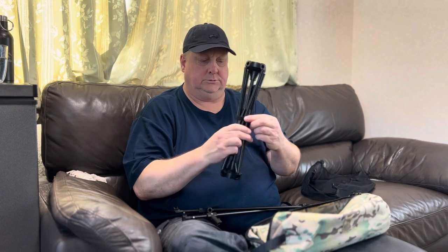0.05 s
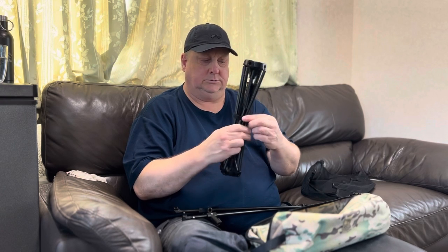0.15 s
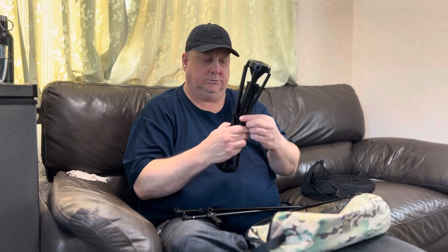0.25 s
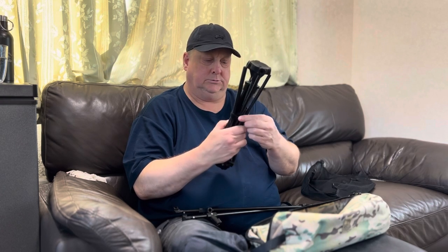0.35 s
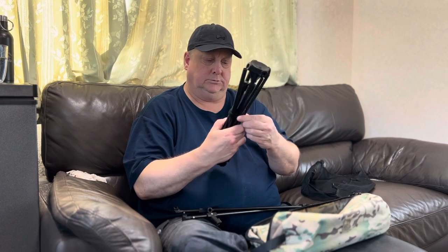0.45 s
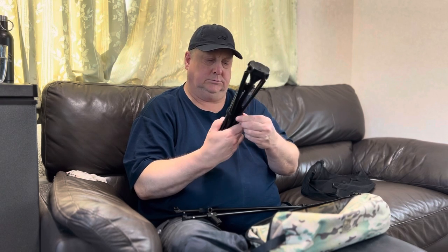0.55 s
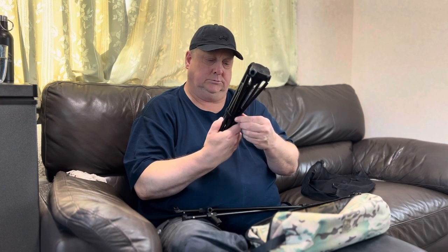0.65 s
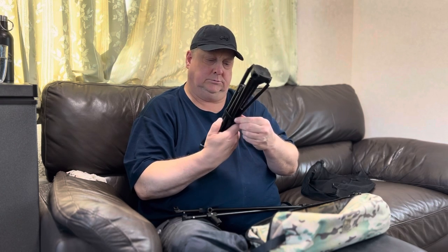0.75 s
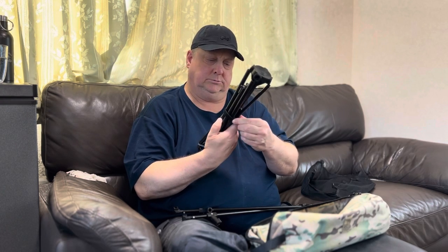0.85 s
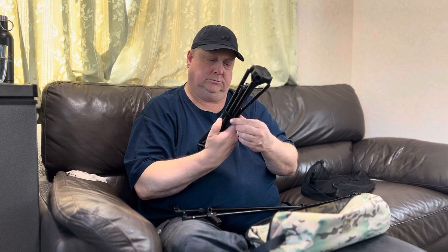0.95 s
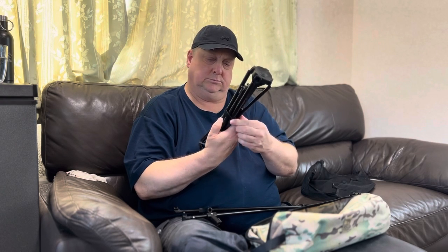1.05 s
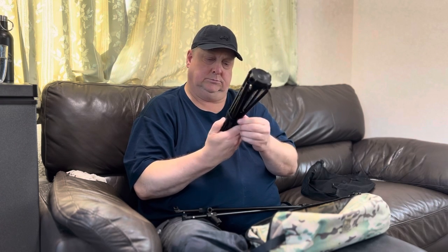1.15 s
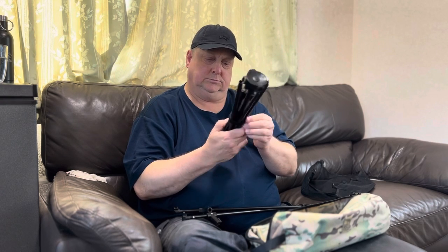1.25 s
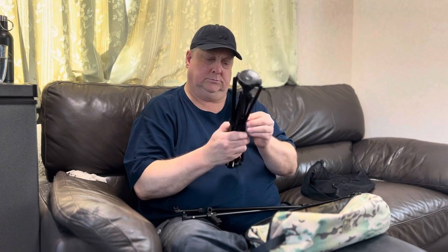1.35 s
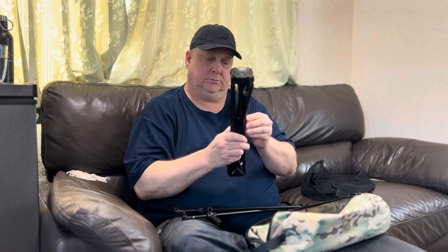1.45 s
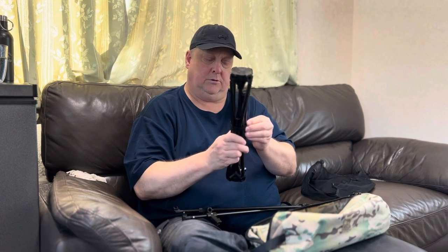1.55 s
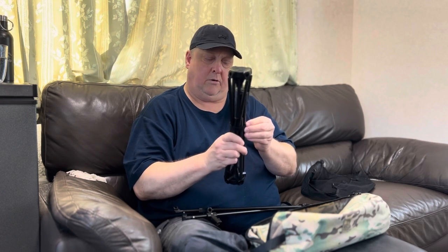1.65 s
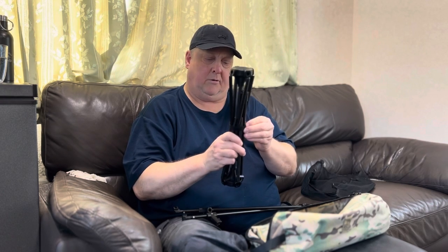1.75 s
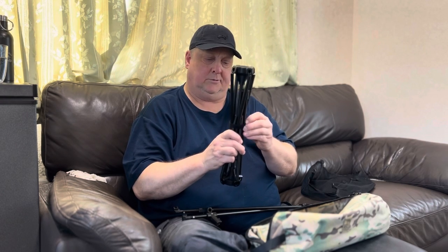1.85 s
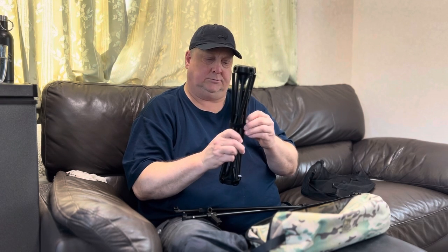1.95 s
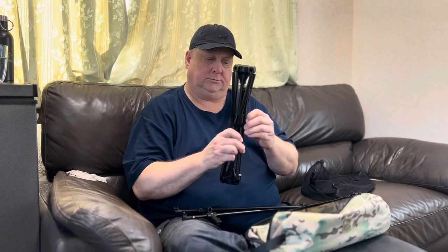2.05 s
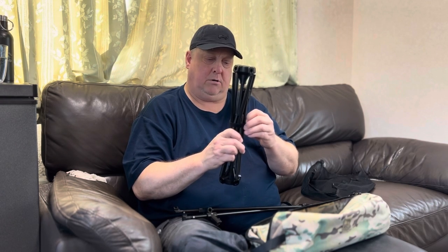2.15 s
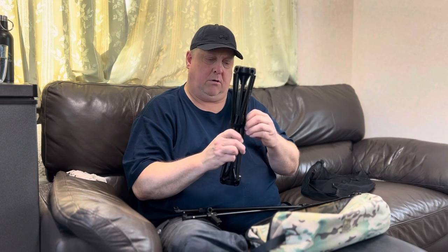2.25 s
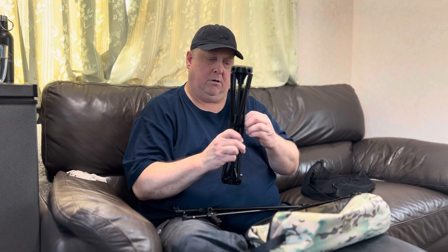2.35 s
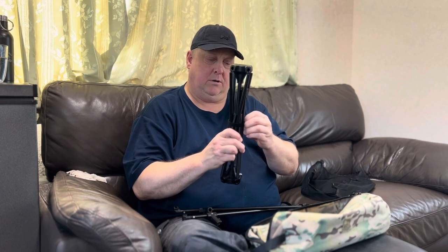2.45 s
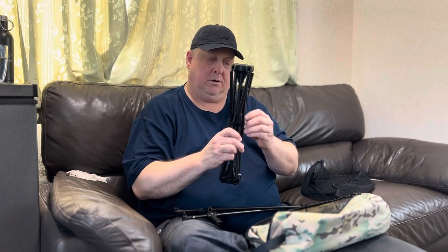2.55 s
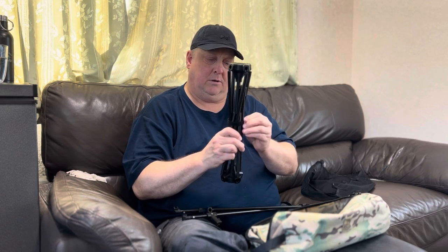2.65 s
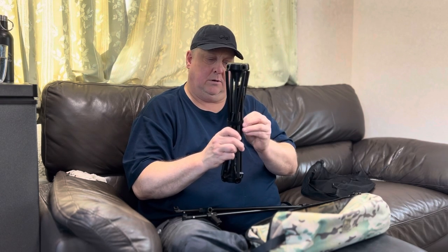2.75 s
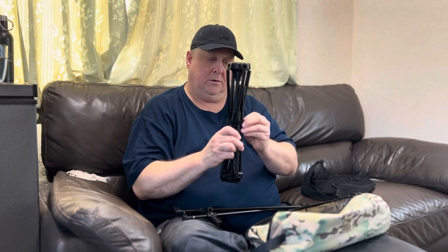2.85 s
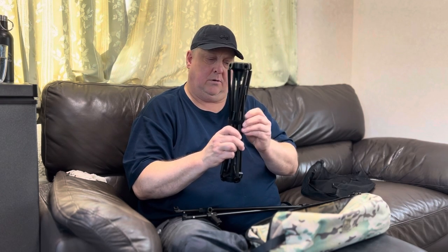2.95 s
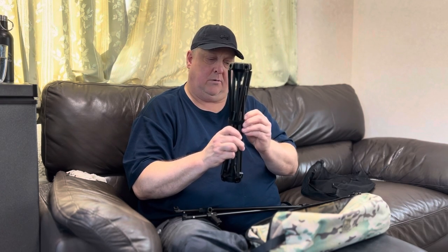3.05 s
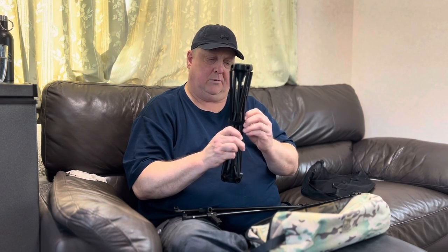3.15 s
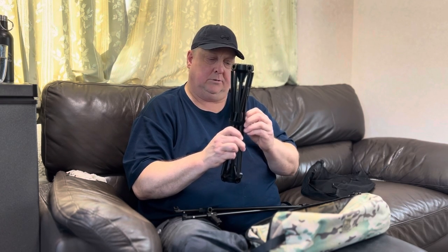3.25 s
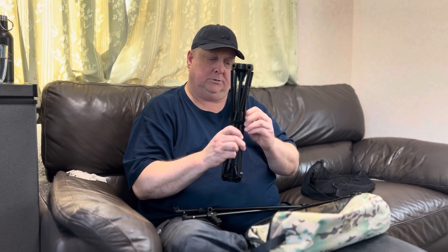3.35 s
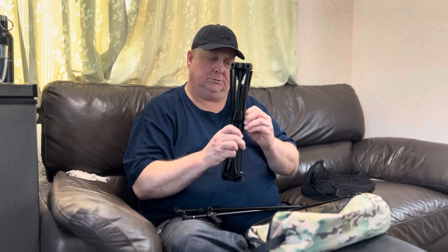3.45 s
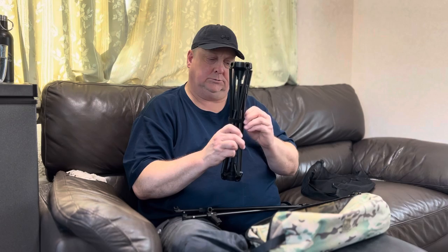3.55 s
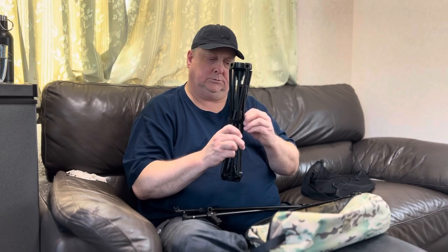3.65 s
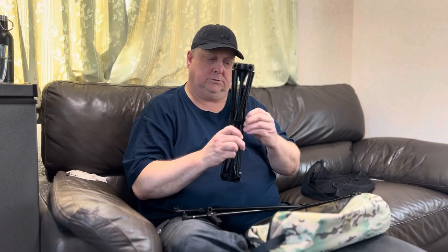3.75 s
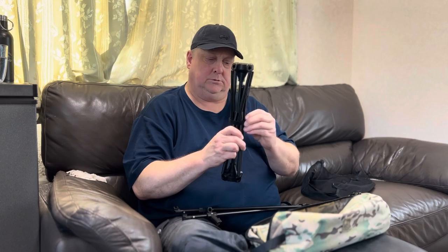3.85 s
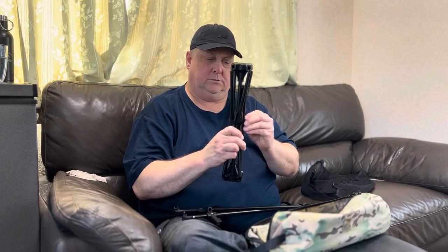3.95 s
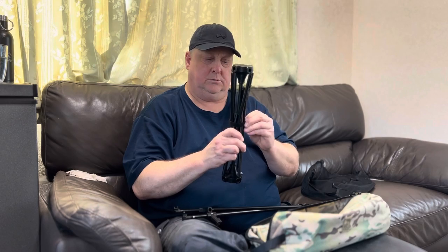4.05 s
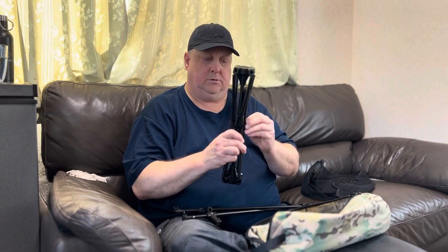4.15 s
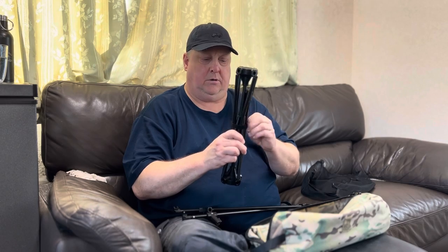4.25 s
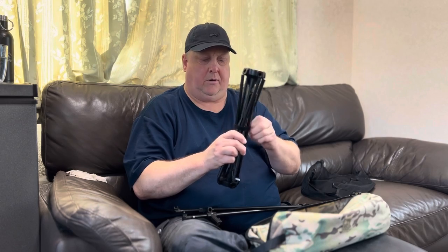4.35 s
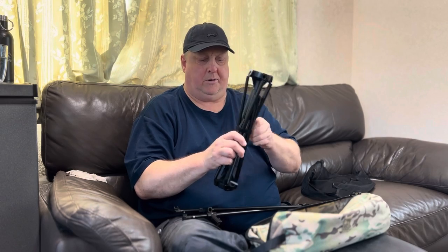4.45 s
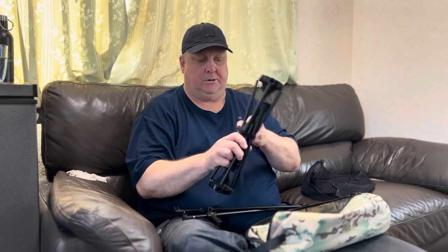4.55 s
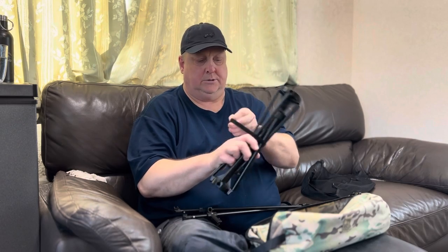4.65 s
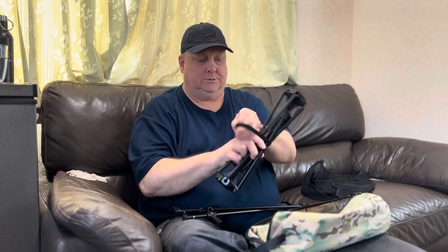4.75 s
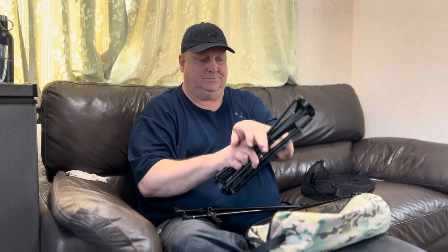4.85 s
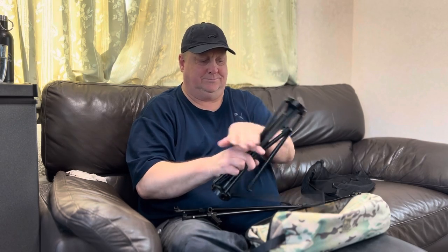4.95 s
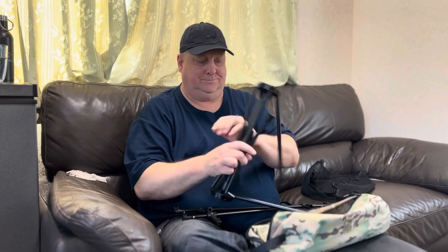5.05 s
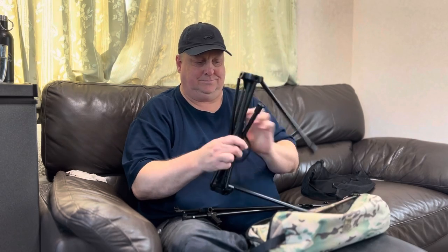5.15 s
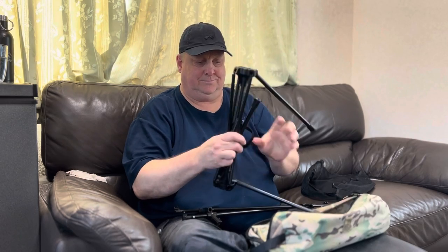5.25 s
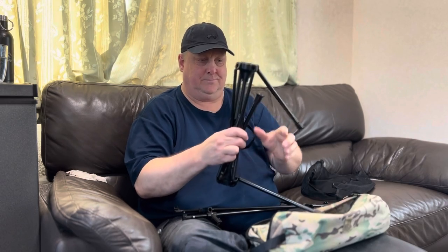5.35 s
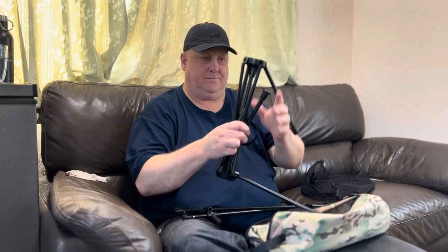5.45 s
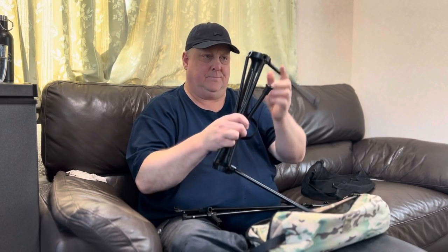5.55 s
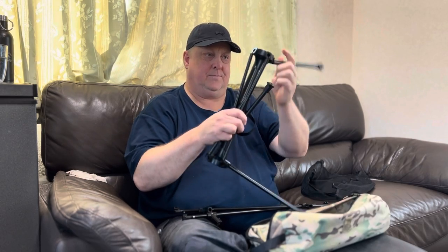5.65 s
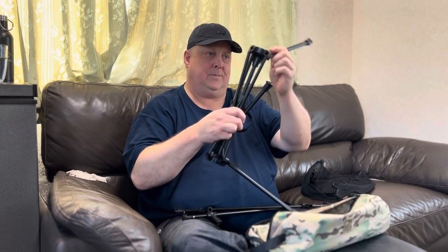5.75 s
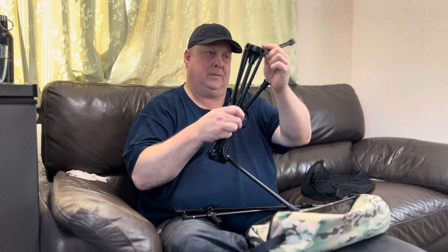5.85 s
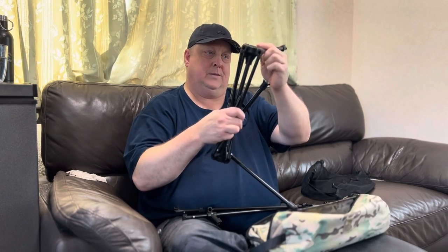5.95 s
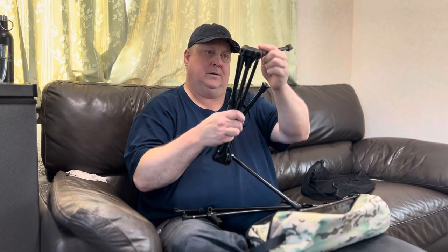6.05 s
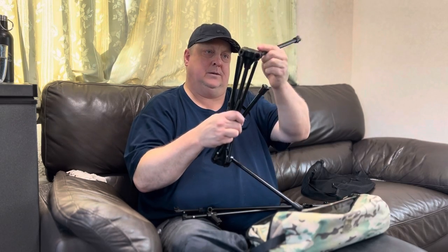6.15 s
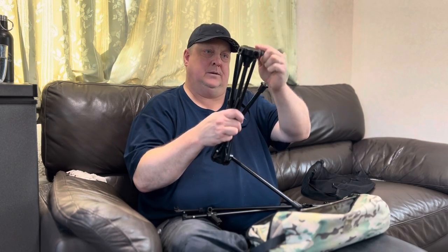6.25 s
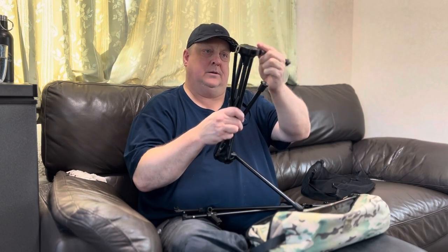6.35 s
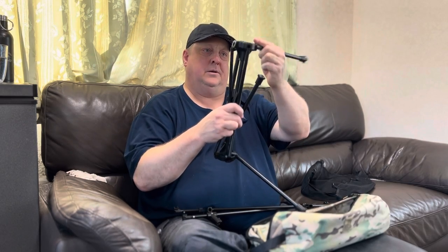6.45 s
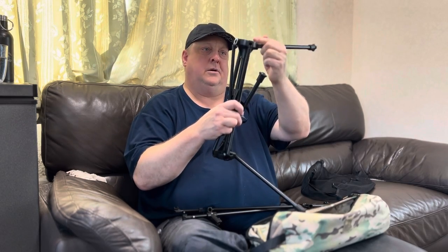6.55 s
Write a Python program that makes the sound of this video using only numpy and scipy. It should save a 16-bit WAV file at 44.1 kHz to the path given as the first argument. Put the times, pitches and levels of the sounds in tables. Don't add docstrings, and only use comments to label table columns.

```python
import sys
import numpy as np
from scipy import signal
from scipy.fft import rfft, irfft, next_fast_len
from scipy.io import wavfile
from scipy.ndimage import uniform_filter1d, map_coordinates

SR = 44100
rng = np.random.default_rng(int(sys.argv[2]) if len(sys.argv) > 2 else 0)


def generate_wav(signal):
    frames = np.transpose(np.atleast_2d(signal))
    scaled = np.clip(frames, -1, 1) * 32767
    pcm = np.round(scaled).astype(np.int16)
    wavfile.write(sys.argv[1], SR, pcm)


def boost_factor(decibels):
    exponent = np.asarray(decibels, float) / 20
    return 10 ** exponent


N = 290788

# f/Hz, level/dB
HOOK_SPECTRUM = [(900, -22), (1900, -9), (3000, -6), (5000, -2.5), (7000, -3), (8700, 2.5), (11500, 4.5),
                 (13200, 1), (16000, 6)]


def unit(x):
    return x / np.sqrt(np.mean(x ** 2) + 1e-20)


def along(points, hz):
    f, v = np.transpose(points)
    return np.interp(np.log(hz + 1), np.log(f + 1), v)


def curve(rows, column):
    rows = np.array(rows)
    gain = np.zeros(N)
    first = round(rows[0, 0] * SR)
    last = min(round(rows[-1, 0] * SR), N)
    gain[first:last] = boost_factor(np.interp(np.arange(first, last) / SR, rows[:, 0], rows[:, column]))
    return gain


def filtered(x, response):
    n = x.shape[-1]
    m = next_fast_len(n + 4096)
    return irfft(rfft(x, m) * response(np.fft.rfftfreq(m, 1 / SR)), m)[..., :n]


def wobble(rate_hz):
    knots = rng.standard_normal(int(N * rate_hz / SR) + 4)
    return map_coordinates(knots, [np.arange(N) * rate_hz / SR])


def add(track, s, sound):
    part = track[round(s * SR):][:len(sound)]
    part += sound[:len(part)]


def noise(spectrum):
    return unit(filtered(rng.standard_normal(N), lambda hz: boost_factor(along(spectrum, hz))))


def patchy(x, depth_db):
    z = signal.stft(x, nperseg=256)[2]
    field = uniform_filter1d(rng.standard_normal(z.shape), size=6, axis=0)
    field = uniform_filter1d(field, size=20, axis=1)
    return unit(signal.istft(z * boost_factor(depth_db * unit(field)), nperseg=256)[1][:N])


def burst(envelope):
    n = len(envelope)
    z = rfft(rng.standard_normal(n) * envelope, 2 * n)
    width = max(3, round(700 * n / SR))
    return irfft(z / np.sqrt(uniform_filter1d(np.abs(z) ** 2, size=width) + 1e-12))[:n]


def stroke(s, rise_s, hold_s, db, fade_db_s):
    t = np.arange(N) / SR - s
    climb_db = np.minimum(t, 0) * 20 / max(rise_s, .001)
    return boost_factor(db + climb_db - fade_db_s * np.maximum(t - abs(hold_s), 0))


def hum():
    # f/Hz, level/dB
    hum_spectrum = [(76, -27.5), (130, -7.5), (206, -8.5), (246, -10), (354, -9.5), (397, -7), (656, -19),
                    (780, -23.5), (928, -21.5), (1690, -21.5), (2010, -24.5), (3120, -37), (3510, -35.5),
                    (8350, -40.5), (13000, -41.5)]
    rumble_spectrum = [(12, -64.5), (20, -44.5), (35, -4), (59, 3.5), (108, -0.5), (140, -7.5),
                       (150, -14.5), (200, -57), (330, -120)]
    # f/Hz, correlation
    likeness = [(60, 0.99), (180, 0.86), (550, 0.41), (1650, 0.27), (4970, 0.3), (15000, -0.098)]
    # full t/s, rise/s, hold/s, level/dB, f/Hz
    engine = (1.46, .06, .25, -72, 200)
    rumble_db, rumble_fade_db_s, rumble_swell_db = -66, 0.83, 1.2

    def turn(hz):
        return np.arccos(np.clip(along(likeness, hz), -1, 1)) / 2

    def mid_side(hz):
        return np.array([np.cos(turn(hz)), np.sin(turn(hz))]) / (1 + (hz / 13300) ** 30)

    swell = boost_factor(rumble_db - rumble_fade_db_s * np.arange(N) / SR + rumble_swell_db * wobble(3.4))
    pair = np.array([boost_factor(-69.5) * noise(hum_spectrum) + boost_factor(3.5) * swell * noise(rumble_spectrum)
                     for _ in range(2)])
    mid, side = filtered(pair, mid_side)
    *passing, pitch_hz = engine
    drone = noise([(pitch_hz * .85, -40), (pitch_hz, 0), (pitch_hz * 1.2, -25), (pitch_hz * 3, -120)])
    mid = mid + stroke(*passing, 300) * drone
    return np.array([mid + side, mid - side])


def brushing():
    # full t/s, rise/s, hold/s, level/dB
    slides = [(0.0, .01, 0.078, -74), (0.073, 0.0088, .33, -74.5), (0.553, 0.32, 0.12, -82),
              (0.83, 0.14, 0.085, -75.5), (1.083, 0.034, 0.012, -68), (1.159, .06, 0.017, -72),
              (1.27, 0.078, 0.11, -67.5), (1.46, .02, 0.031, -79.5), (1.67, 0.062, 0.009, -68),
              (1.718, 0.006, 0.0069, -70), (1.798, 0.033, 0.026, -68.5), (2.014, 0.023, .005, -70),
              (2.071, 0.0055, 0.0083, -69.5), (2.238, 0.011, 0.009, -63), (2.402, .05, 0.043, -74.5),
              (2.532, 0.045, 0.017, -72.5), (2.964, 0.0063, 0.0041, -68.5), (3.176, .01, 0.0077, -82),
              (3.254, 0.0039, 0.0033, -70), (3.433, 0.041, 0.022, -63.5), (3.513, .006, 0.0046, -74),
              (3.7, 0.078, .02, -64.5), (3.827, 0.016, 0.016, -95.5), (4.02, .05, .01, -82),
              (5.436, 0.072, .01, -73.5), (5.593, 0.093, 0.011, -69.5), (5.693, 0.059, .005, -51),
              (6.24, 0.052, 0.05, -76.5), (6.48, 0.068, .02, -72)]
    # full t/s, rise/s, hold/s, level/dB
    shifts = [
        (4.45, .2, 0.097, -57.5),
        (4.97, .18, 0.13, -47),
        (5.36, .2, 0.44, -59.5),
        (6.05, .2, 0.033, -63.5),
    ]
    # full t/s, rise/s, hold/s, level/dB
    cushion = (6.59, .5, .01, -57)
    # f/Hz, level/dB
    skin_spectrum = [(900, -36), (1800, -4), (3000, -5), (6000, -1), (8500, -3.5), (11500, -11),
                     (13500, -29.5), (16000, -38)]
    cloth_spectrum = [(100, -33.5), (250, -2), (450, -3), (700, -7), (1500, -4.5), (3000, -9),
                      (6000, -31.5), (13000, -34), (14000, -60)]
    leather_spectrum = [(100, -20), (250, 2), (700, -5), (1600, -6), (2300, -14), (3500, -16), (6000, -36),
                        (13000, -38), (14000, -60)]
    skin_fade_db_s, cloth_fade_db_s = 506, 85

    touch = sum(stroke(*row, skin_fade_db_s) for row in slides)
    skin = touch * boost_factor(-4 + 1.5 * wobble(60)) * patchy(noise(skin_spectrum), depth_db=4)
    shift = sum(stroke(*row, cloth_fade_db_s) for row in shifts)
    cloth = shift * boost_factor(-7.5 + 0.83 * wobble(23)) * noise(cloth_spectrum)
    settle = stroke(*cushion, cloth_fade_db_s) * boost_factor(-7 + 1.5 * wobble(20)) * noise(leather_spectrum)
    return skin + settle + cloth


def bumps():
    # t/s, peak level/dB, f/Hz, t60/s
    pushes = [(4.425, -44.5, 875, 0.054), (4.55, -46, 800, 0.034), (4.915, -37, 415, 0.012),
              (4.963, -36, 433, 0.019), (4.976, -27, 680, 0.025), (4.977, -35, 340, 0.04),
              (4.975, -43, 95, 0.2), (5.0, -41.5, 78, .35), (5.08, -53, 80, .2),
              (5.262, -41.5, 375.8, 0.02), (5.64, -48.5, 480, 0.11), (5.745, -45, 370.4, 0.061),
              (6.018, -35, 500, 0.008), (6.036, -44, 420, 0.015), (6.1087, -46, 1400, 0.008),
              (6.109, -53, 3400, 0.008), (6.504, -50, 300, 0.08)]
    out, t = np.zeros(N), np.arange(SR // 3) / SR
    for s, db, pitch_hz, t60_s in pushes:
        body = lambda hz: (1j * hz * pitch_hz / (pitch_hz ** 2 - hz * hz + .9j * hz * pitch_hz)) ** 2
        envelope = boost_factor(-60 * t / t60_s) * (1 - np.exp(-t / 0.00057))
        push = filtered(rng.standard_normal(len(t)) * envelope, body)
        add(out, s, boost_factor(db) * push / np.abs(push).max())
    return out


def ticks():
    # t/s, peak level/dB, colour f/Hz, broad part level/dB
    nail_ticks = [(0.0722, -53, 7540, -18), (1.72, -55, 8900, -4), (1.8542, -56, 2680, -22),
                  (2.0176, -62, 2730, -22), (2.0657, -64, 6800, -38), (2.151, -56, 7900, -12),
                  (2.9663, -60, 8600, -10), (3.2535, -70, 1820, -5), (3.99, -57.5, 3490, -0.5),
                  (4.0223, -50, 4200, 1), (6.2361, -64, 3300, -12)]
    # t/s, peak level/dB, colour f/Hz, broad part level/dB
    hook_snaps = [(2.238, -54, 7000, 0), (2.2473, -50, 2900, -3), (2.26, -47, 7500, 0),
                  (2.2722, -38, 5000, 0), (3.4, -38, 2600, 4), (3.4184, -40, 5000, 3),
                  (3.511, -51, 8550, -14), (3.518, -38, 8950, -2), (3.535, -35, 6000, 0),
                  (3.562, -44, 1920, 7), (3.5775, -37, 2620, -8), (4.0376, -52, 4200, -21.5),
                  (4.0512, -48.5, 8200, -4), (4.0633, -43, 8500, 2), (4.181, -40.5, 9000, -3.5),
                  (4.1916, -42, 9600, -13.5), (4.219, -40.5, 5850, -11), (4.2444, -36.5, 4670, -4),
                  (4.2582, -36.5, 8500, 2.5), (4.275, -36, 1920, 0.5), (4.292, -42.5, 5000, 0),
                  (4.304, -35, 1910, 0.5), (4.326, -36.5, 9700, -2.5), (4.338, -33, 1910, -4),
                  (4.457, -33.5, 8500, -4.5), (4.488, -25.5, 9000, -3.5), (4.508, -31, 8500, 0.5),
                  (4.545, -27.5, 8500, 0), (4.6048, -34, 7700, 0)]
    out, t = np.zeros(N), np.arange(1024) / SR
    for s, db, colour_hz, broad_db in nail_ticks + hook_snaps:
        snap = burst(boost_factor(-60 * t / 0.013) * (1 - np.exp(-t / 0.0003)))
        hump = lambda hz: 1.3 * np.exp(-(np.log((hz + 1) / colour_hz) / 0.15) ** 2)
        snap = filtered(snap, lambda hz: boost_factor(along(HOOK_SPECTRUM, hz) + broad_db) + hump(hz))
        add(out, s, boost_factor(db + 3.5) * snap / np.abs(snap).max())
    return out


def strap():
    # peak t/s, rise/s, level/dB, dullness/dB
    pick_rows = [(2.262, 0.015, -35, -51), (2.281, 0.004, -39, -4), (2.701, 0.027, -75, 13),
                 (2.742, 0.03, -49, -8.5), (2.862, 0.014, -64, -4), (3.402, 0.004, -46.5, -5),
                 (3.519, 0.0037, -37, -53), (3.538, 0.013, -35.5, -43), (3.565, 0.021, -49, 2),
                 (3.583, .02, -57, -4), (4.039, 0.0043, -57, -12), (4.066, 0.035, -56, -6.5),
                 (4.604, .006, -42.5, -0.5), (5.94, 0.015, -60.5, 19)]
    # t/s, pull level/dB
    pull = [
        (4.19, -43),
        (4.27, -38),
        (4.33, -51.5),
        (4.345, -37),
        (4.4, -36),
        (4.45, -31),
        (4.51, -30),
        (4.56, -44.5),
        (4.6, -74),
    ]
    # t/s, dullness/dB
    dullness = [
        (4.178, -48),
        (4.27, -42),
        (4.34, -14.5),
        (4.6, -13),
    ]
    hook_fade_db_s = 696.5

    spread_db = 4.5 * np.minimum(rng.exponential(size=N), 1.6)
    clump_db = 1.6 * np.clip(wobble(150), -2, 1.3)
    size = rng.standard_normal(N) * boost_factor(spread_db + clump_db)
    hooks = size * (rng.random(N) < .22)
    bright = unit(filtered(hooks, lambda hz: boost_factor(along(HOOK_SPECTRUM, hz))))
    dull = unit(filtered(hooks, lambda hz: boost_factor(along(HOOK_SPECTRUM, hz)) / (1 + (hz / 1800) ** 2)))
    picks = sum(stroke(s, rise_s, 0, db, hook_fade_db_s) * (bright + boost_factor(dull_db) * dull)
                for s, rise_s, db, dull_db in pick_rows)
    tear = curve(pull, column=1) * (bright + curve(dullness, column=1) * dull)
    return boost_factor(-5) * (picks + tear)


def rings():
    # t/s, f/Hz, peak level/dB, t60/s
    modes = [(2.017, 2880, -69, 0.035), (2.066, 3840, -60, .025), (2.064, 6970, -55.5, .025),
             (2.066, 5660, -64, 0.022), (2.317, 1116, -56, 0.04), (2.342, 1116, -55, 0.025),
             (4.245, 1850, -56, 0.1), (4.272, 1920, -49, 0.05), (4.352, 2350, -44, 0.04),
             (4.37, 1950, -50, 0.05), (4.22, 6000, -46, 0.03), (4.827, 5300, -28, 0.031),
             (4.94, 2330, -34, 0.14), (4.976, 2320, -44, 0.077), (5.259, 4510, -34, .21),
             (5.743, 3497, -32, .15), (5.743, 3704, -38, .13), (6.503, 3480, -44, .09),
             (5.258, 4690, -34.5, .1), (5.259, 1850, -49, 0.061), (5.743, 2010, -29, 0.05),
             (5.745, 2290, -38.5, 0.068), (5.743, 1830, -39, .13), (5.743, 2105, -41, .15),
             (5.762, 4770, -43, .07), (5.743, 2815, -40, .12), (5.262, 2649, -34, .12),
             (5.262, 2370, -40, .14), (5.262, 1983, -44, .12), (5.262, 3391, -38, .12),
             (5.123, 1997, -38, .09), (5.123, 2186, -41, .1), (5.13, 2729, -42, .1), (4.978, 1954, -36, .1),
             (4.978, 2254, -37, .1), (4.978, 645, -40, .07), (4.978, 1070, -37, .08),
             (4.978, 1371, -37, .07), (5.957, 2150, -42, .04), (4.91, 7250, -38, .06),
             (5.743, 4636, -36.5, 0.053), (5.944, 6490, -48, 0.036)]
    waver_rad = 0.7
    out, t = np.zeros(N), np.arange(SR // 3) / SR
    for s, hz, db, t60_s in modes:
        waver = waver_rad * map_coordinates(rng.standard_normal(40), [t * 90])
        tone = np.sin(2 * np.pi * hz * t + waver)
        add(out, s, boost_factor(db - 60 * t / t60_s) * tone * (1 - np.exp(-t / 0.001)))
    return out


def knocks():
    # f/Hz, width/Hz, level/dB
    resonances = [(675, 88, -5), (1390, 92, -10), (1920, 59, -5), (2330, 390, 3.5), (2660, 167, 4.5),
                  (3780, 83, -6.5), (4620, 120, 11.5), (5300, 300, 21), (6180, 820, 3), (6950, 290, 11),
                  (8300, 300, 16.5), (8500, 370, -16)]
    # t/s, peak level/dB, colour f/Hz, low part level/dB, chatter/s
    rattles = [(2.282, -28, 2800, -20, 0.007), (3.5831, -29, 2400, -25, 0.011),
               (3.85, -44, 2600, -24, 0.013), (4.6629, -31, 2200, -30, 0.03),
               (4.7315, -25, 2950, -30, 0.008), (4.7395, -33, 2200, -25, 0.01),
               (4.7483, -22, 4500, -29.5, 0.03), (4.8177, -30, 2380, -12, 0.013),
               (4.8243, -16.5, 4880, -25, 0.024), (4.8465, -21, 7160, -43, 0.032),
               (4.9095, -27, 7200, -36, 0.03), (4.914, -23, 3600, -30, 0.02),
               (4.9195, -23, 4500, -36, 0.03), (4.927, -27, 2400, -30, 0.02),
               (4.9395, -25, 2500, -24, 0.02), (4.948, -28, 2100, -24, 0.02),
               (4.9555, -25, 4800, -20, 0.02), (4.962, -24, 2300, -8.5, 0.03)]
    # t/s, peak level/dB, colour f/Hz, low part level/dB, chatter/s
    clacks = [(4.9745, -13, 1900, -15, 0.012), (4.9783, -8.5, 2300, -20, 0.011),
              (4.9855, -19, 2000, -18, 0.015), (4.992, -18, 2320, -10.5, 0.023),
              (5.118, -36, 2000, -20, 0.01), (5.1222, -20, 1950, -22, 0.012),
              (5.125, -21, 2000, -22, 0.015), (5.132, -28, 2700, -25, 0.03), (5.2563, -13, 7700, -30, 0.01),
              (5.2595, -15, 2000, -29.5, 0.015), (5.266, -15, 4500, -30, 0.02),
              (5.262, -13, 5900, -30.5, 0.015), (5.44, -39, 2300, -26, 0.11), (5.619, -45, 2400, -5, 0.08),
              (5.681, -30.5, 5000, -42, 0.021), (5.7422, -14, 3500, -28, 0.012),
              (5.752, -26, 3500, -28, 0.012), (5.765, -30, 4750, -35, 0.015), (5.932, -42, 2000, -25, 0.03),
              (5.9386, -34, 1510, -25, 0.015), (5.944, -26, 1523, -25.5, 0.027),
              (5.957, -34.5, 2220, -16, 0.072), (6.5023, -25, 2900, -16, 0.015),
              (6.507, -29, 2000, -16, 0.02)]
    rattle_high_db, rattle_top_db = -7, 1
    clack_high_db, clack_top_db = -12, -8
    high_db_per_octave = 6.5

    out, t = np.zeros(N), np.arange(SR // 10) / SR
    blows = [(*row, rattle_high_db, rattle_top_db) for row in rattles]
    blows += [(*row, clack_high_db, clack_top_db) for row in clacks]
    for s, db, colour_hz, low_db, chatter_s, base_db, top_db in blows:
        high_db = base_db + high_db_per_octave * np.log2(colour_hz / 2500)
        spot_db = 2.5 * rng.standard_normal(len(resonances))
        tubes = lambda f: 7.0 + sum((-1) ** k * boost_factor(level + spot_db[k]) * 1j * f * w / (c * c - f * f + 1j * f * w)
                                    for k, (c, w, level) in enumerate(resonances))
        rebounds = boost_factor(2.5 * uniform_filter1d(rng.standard_normal(len(t)), size=40) * np.sqrt(40))
        swell = boost_factor(-60 * t / np.clip(chatter_s, .003, .3)) * (1 - np.exp(-t / 0.0004))
        tilt = [(120, low_db + 1), (500, low_db + 21.0), (1100, low_db + 23.0), (1900, 6.5), (4500, 1.5),
                (7500, high_db + 7), (9500, high_db - 2), (12000, high_db + top_db),
                (14500, high_db + top_db - 16.5)]
        hump = lambda hz: 1 + 1.1 * np.exp(-(np.log((hz + 1) / colour_hz) / 0.13) ** 2)
        blow = filtered(burst(rebounds * swell),
                        lambda hz: tubes(hz) * hump(hz) * boost_factor(np.minimum(along(tilt, hz), 6)))
        add(out, s, boost_factor(db - 2.5) * blow / np.abs(blow).max())
    return out


def room(x):
    # f/Hz, t60/s
    decay = [(200, .38), (550, .31), (1400, .26), (3700, .26), (9700, .23)]
    # f/Hz, level/dB
    wet_level = [(200, -1.5), (600, 2.5), (1500, 2.5), (4000, 0), (7000, 2), (12000, -0.5)]
    out, step = np.zeros((2, N + SR)), SR // 4
    hz, t, z = signal.stft(rng.standard_normal((N // step + 1, 2, SR // 3)), SR, nperseg=256)
    tails = signal.istft(z * boost_factor(-60 * t / along(decay, hz)[:, None]), SR, nperseg=256)[1]
    tails *= 1 - np.exp(-np.arange(tails.shape[-1]) / SR / 0.00065)
    tails = tails + 0.046 * tails[:, ::-1]
    for k, tail in enumerate(tails):
        wet = signal.fftconvolve(x[None, k * step:(k + 1) * step], tail / np.linalg.norm(tail[0]), axes=1)
        out[:, k * step:k * step + wet.shape[1]] += wet
    left, right = out[:, :N]
    long_waves = lambda hz: [np.ones_like(hz), hz / (hz + 250)]
    mid, side = filtered(np.array([left + right, left - right]) / 2,
                         lambda hz: boost_factor(along(wet_level, hz)) * long_waves(hz))
    return np.array([mid + side, mid - side])


def scene():
    # f/Hz, level/dB
    left_level = [(200, -1.8), (800, -0.5), (2500, 2), (6400, 6.5), (10000, 0)]
    # f/Hz, phase/rad
    left_lead = [(300, 0), (2500, 0.7), (7500, 1.44), (10600, 0.5), (12500, -8.5), (15100, -11)]
    near = brushing() + strap() + ticks() + knocks() + rings() + bumps()
    half = np.array([[.5], [-.5]])
    direct = filtered(near, lambda hz: boost_factor(half * along(left_level, hz)) * np.exp(1j * half * along(left_lead, hz)))
    return direct + boost_factor(-1.5) * room(near) + hum()


def unmasked(x):
    # low f/Hz, high f/Hz, least level against the middle/dB
    bands = [(9500, 10700, -25), (10700, 12000, -34), (12000, 13700, -33), (14300, 16300, -39)]
    hz, _, z = signal.stft(x, SR, nperseg=1024)
    power = (np.abs(z) ** 2).sum(axis=0) + 1e-20
    middle = power[(hz > 700) & (hz < 9000)].sum(axis=0)
    for low_hz, high_hz, least_db in bands:
        band = (hz >= low_hz) & (hz < high_hz)
        margin_db = 10 * np.log10(power[band].sum(axis=0) / middle) - least_db
        z[:, band] *= 1 / (1 + np.exp(-np.clip(2 * margin_db, -20, 20)))
    return signal.istft(z, SR, nperseg=1024)[1][:, :N]


def roll_off(x):
    return signal.sosfilt(signal.butter(12, 17130, fs=SR, output="sos"), x)


def record(dry):
    # f/Hz, width/Hz, depth 0-1
    dead_bands = [(10250, 480, .995), (13950, 620, .998)]
    top_hz = 16000
    dips = lambda hz: np.prod([1 - np.clip(depth, 0, 1) * np.exp(-((hz - centre_hz) / width_hz) ** 4)
                               for centre_hz, width_hz, depth in dead_bands], axis=0)
    mix = unmasked(filtered(dry, lambda hz: dips(hz) * (hz < top_hz)))
    return roll_off(mix)


dry = scene()
out = record(dry)
generate_wav(out)
```